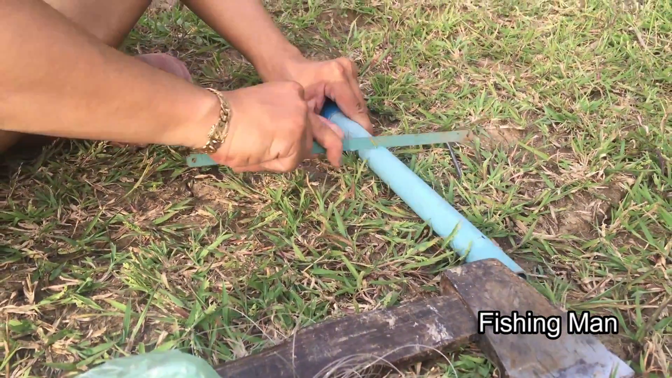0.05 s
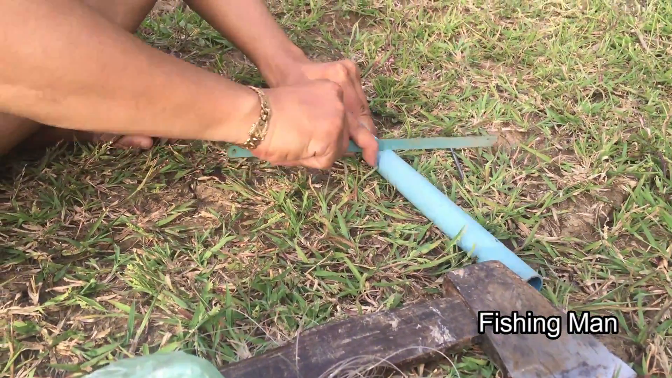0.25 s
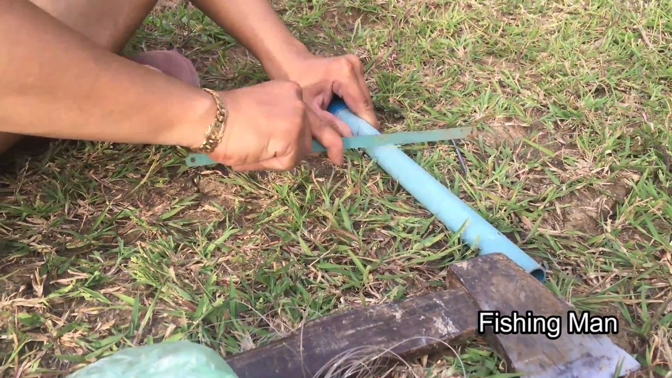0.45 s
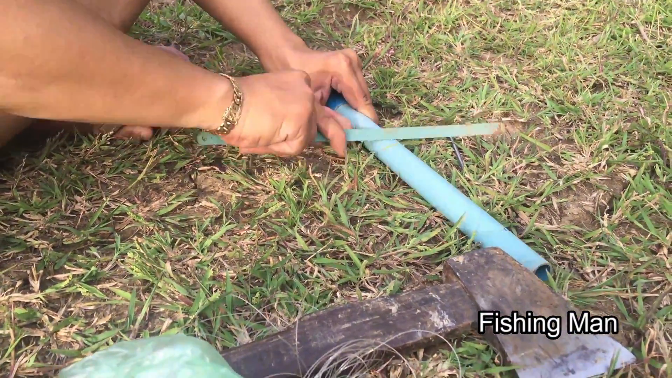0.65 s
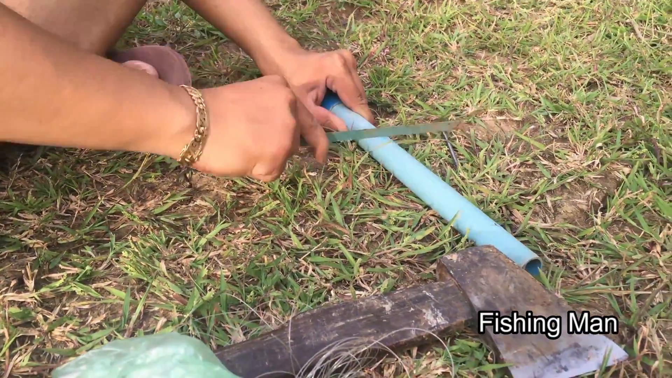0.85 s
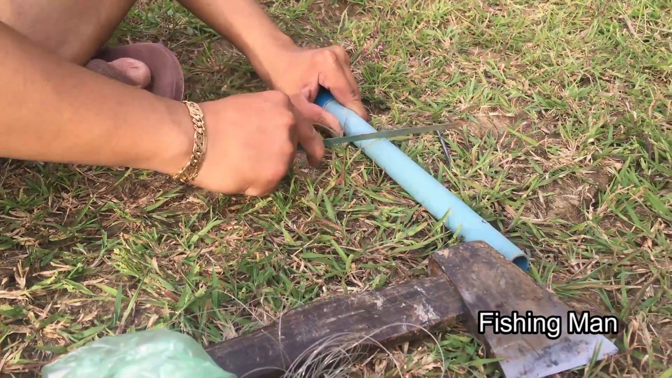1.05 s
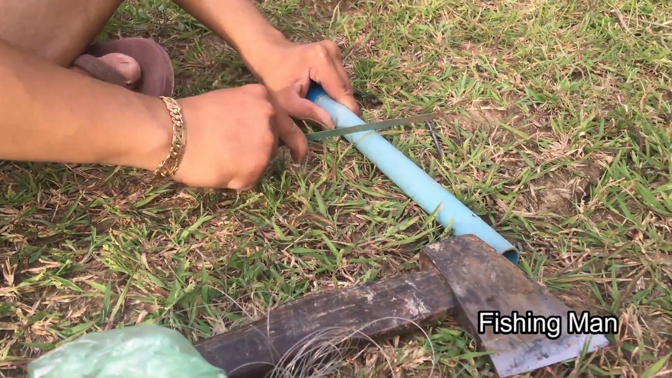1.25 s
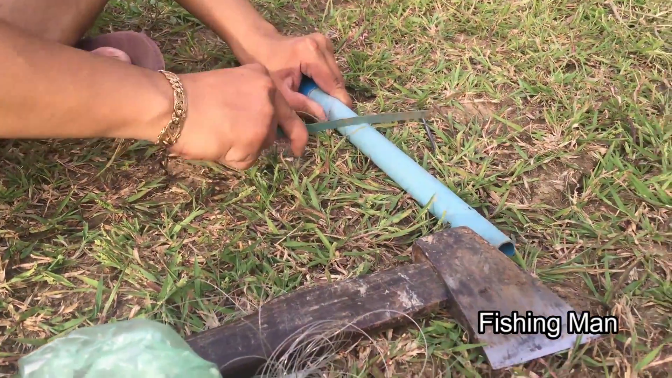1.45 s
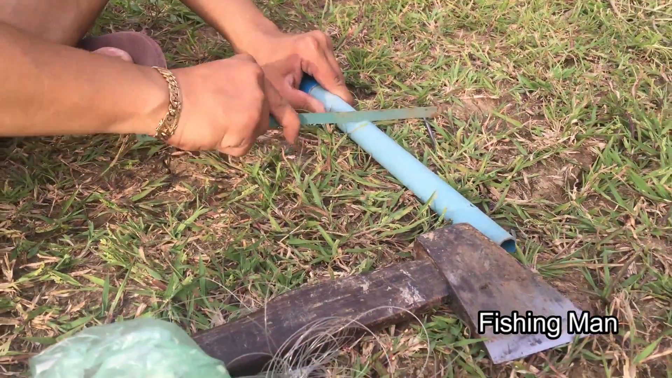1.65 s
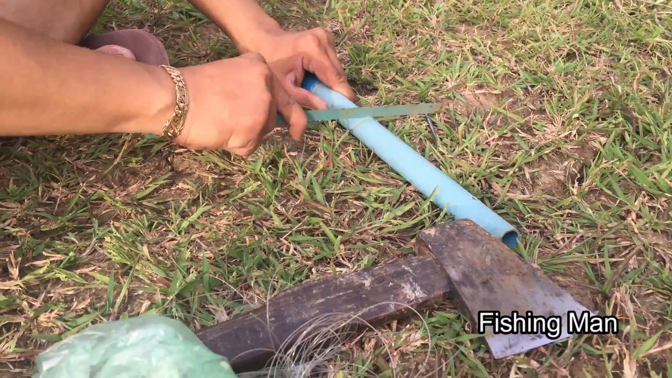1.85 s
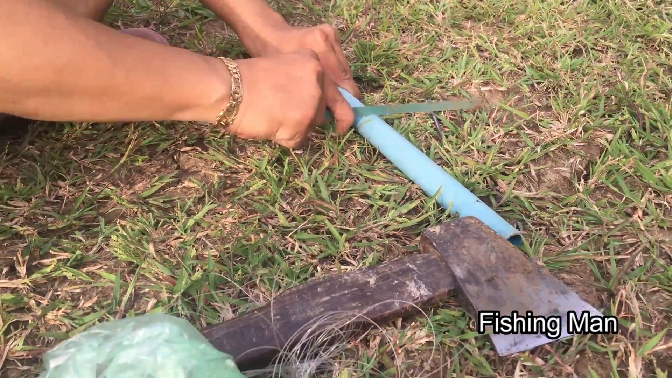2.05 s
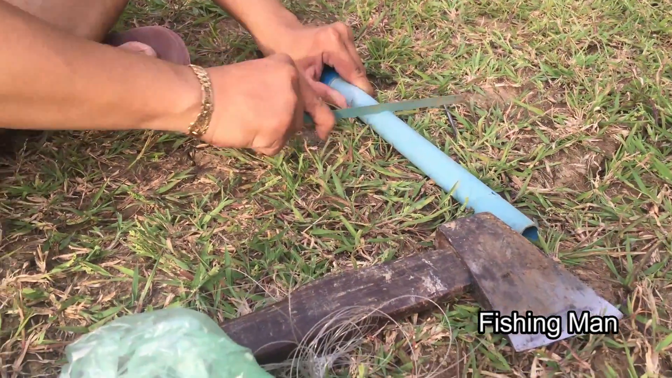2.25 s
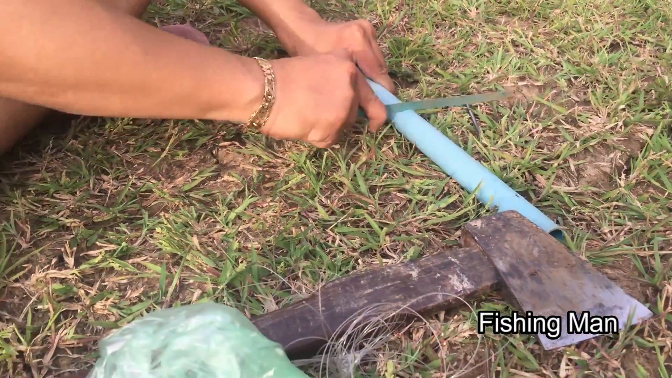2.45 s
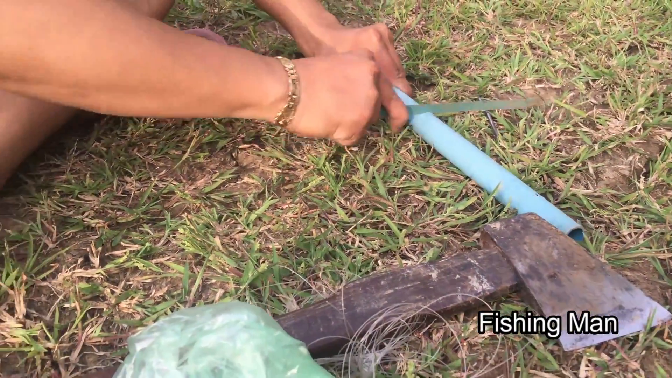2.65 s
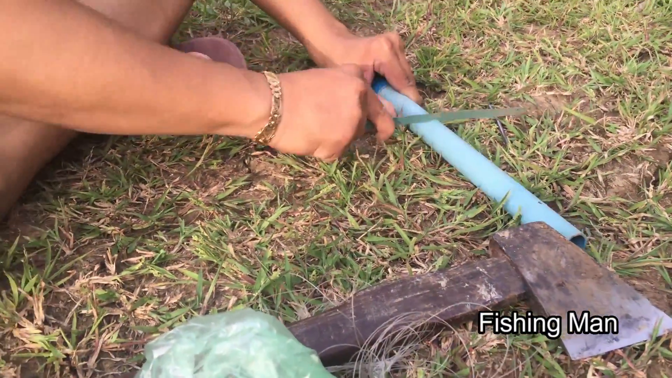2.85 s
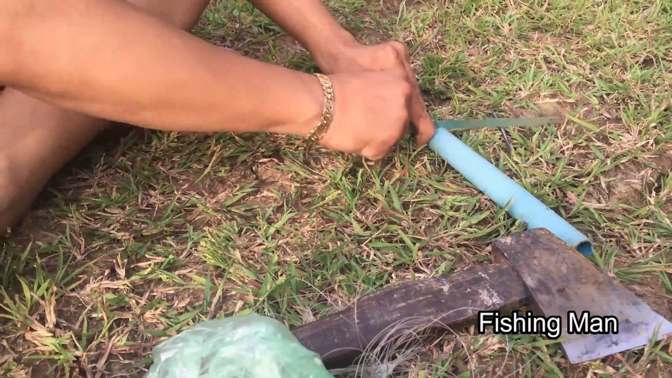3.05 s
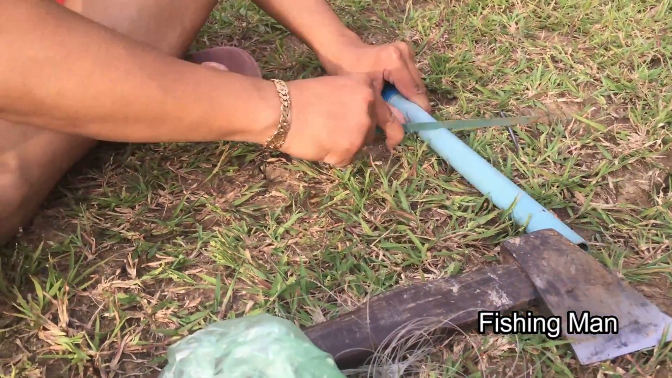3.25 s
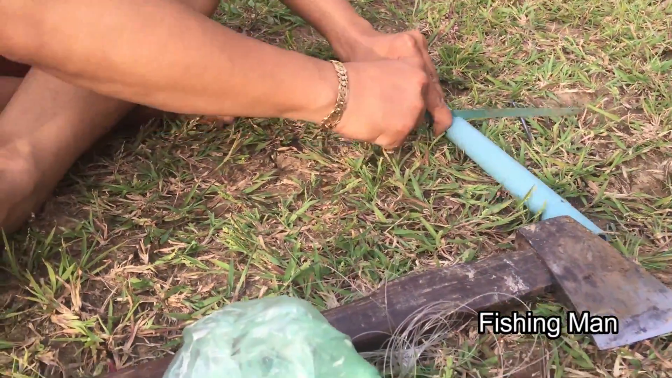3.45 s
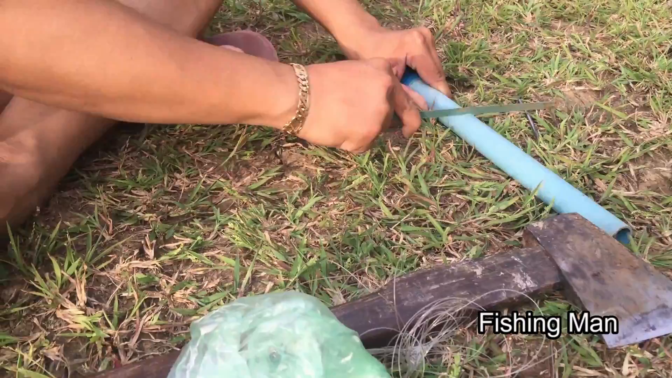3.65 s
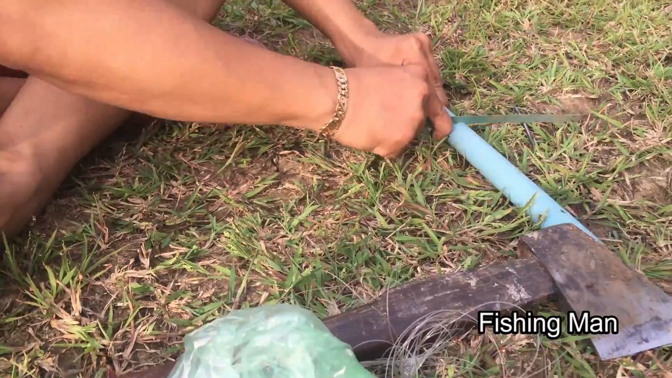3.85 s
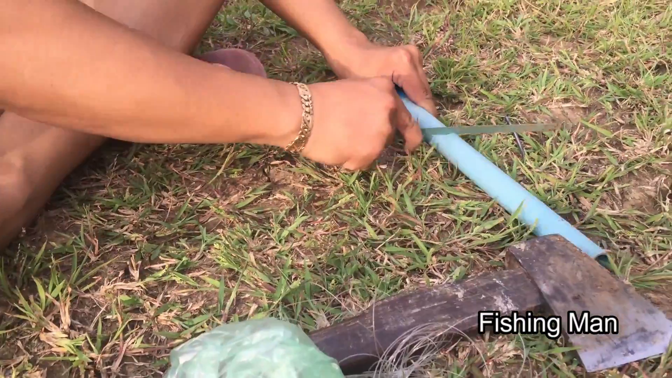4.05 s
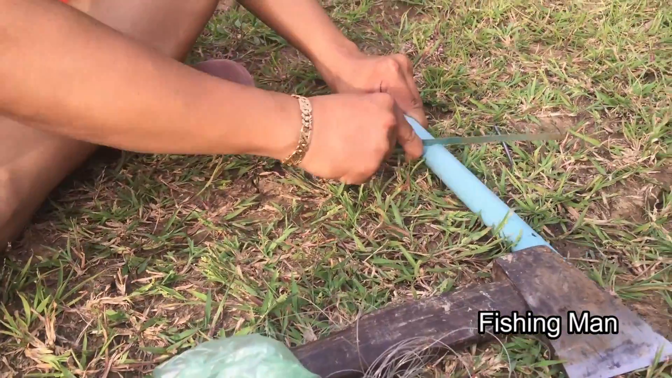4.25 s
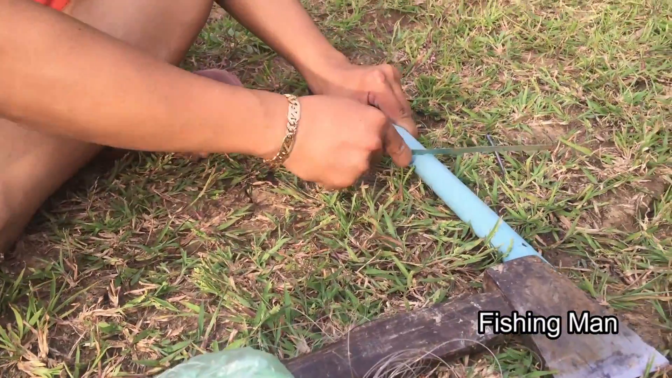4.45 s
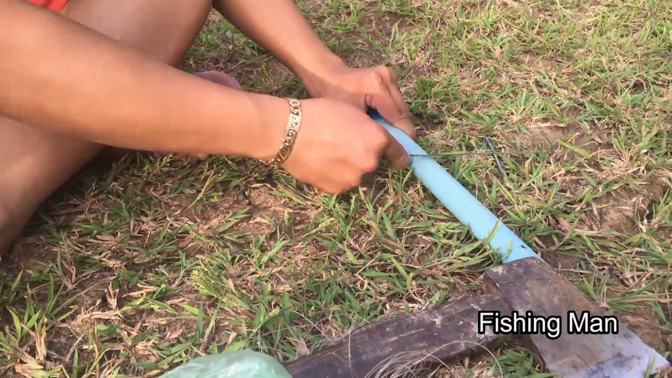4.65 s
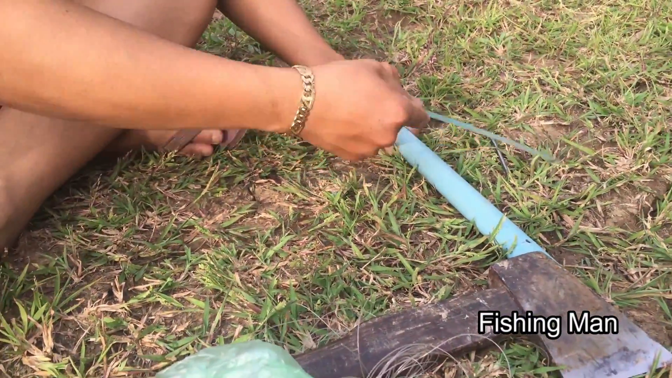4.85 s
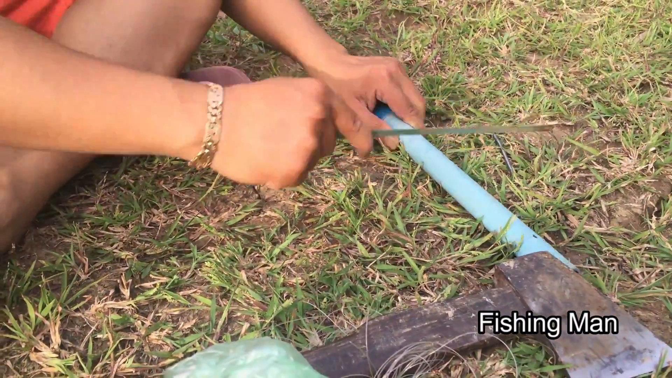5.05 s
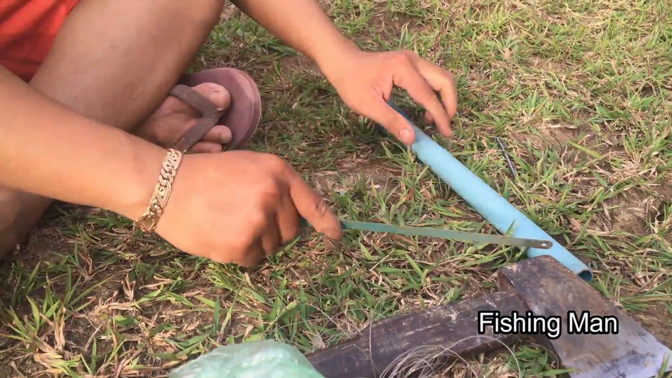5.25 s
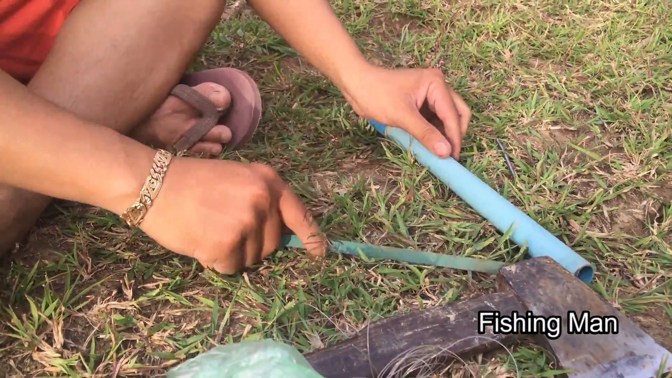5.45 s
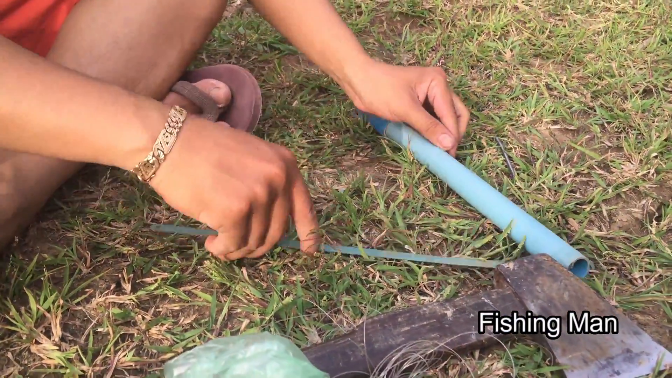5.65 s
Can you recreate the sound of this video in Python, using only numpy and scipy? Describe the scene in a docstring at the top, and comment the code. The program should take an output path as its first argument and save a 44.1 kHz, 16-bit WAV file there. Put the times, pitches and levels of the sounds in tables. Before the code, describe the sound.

Outdoors, dry and close: plastic pipe is sawn by hand with a fine-toothed blade. Two isolated strokes come first, then the blade sticks, nudging and ticking. A fast run of hissy, hollow rasping strokes follows with short squeaks and sharp tooth catches, ending in small clicks and near quiet. Wind rumbles and thumps, with soft rustles and one faint distant bird chirp.

```python
"""A bare hacksaw blade cuts a plastic pipe on grass, close up: a few strokes, a jam, then a quick run until it slips out.
Tooth bites drive the pipe's resonances for the rasp and the blade's treble for the hiss; the pulls stick and slip.
Snagged teeth ring wall, pipe, air and blade as short clicks; gliding tones make the squeaks of the pushes.
Wind buffets the microphone as shaped noise and sinking thumps, over rustles, a quiet murmur and one far bird."""
import sys
import numpy as np
from scipy import signal
from scipy.fft import rfft, irfft, next_fast_len
from scipy.io import wavfile
from scipy.ndimage import uniform_filter1d, map_coordinates

SR = 44100
rng = np.random.default_rng(int(sys.argv[2]) if len(sys.argv) > 2 else 0)


def bounce(signal):
    """Save signal as a 16-bit WAV file at the path given by the first command-line argument."""
    frames = np.transpose(np.atleast_2d(signal))
    limited = np.clip(frames, -1, 1)
    pcm = np.round(limited * 32767).astype(np.int16)
    wavfile.write(sys.argv[1], SR, pcm)


N = 251811  # length in samples


def amp(db):
    """Decibels to gain."""
    return 10 ** (np.asarray(db) / 20)


def unit(x):
    """Scale to rms 1."""
    return x / np.sqrt(np.mean(x ** 2) + 1e-20)


def curves(rows):
    """One value per sample for each column after the time."""
    times, *columns = np.transpose(rows)
    return [np.interp(np.arange(N) / SR, times, column) for column in columns]


def wobble(rate):
    """A smooth random curve, rate knots a second."""
    knots = rng.standard_normal(int(N * rate / SR) + 4)
    return map_coordinates(knots, [np.arange(N) * rate / SR])


def filtered(x, response):
    """x times a response over frequency, padded so that it can ring on."""
    size = next_fast_len(len(x) + 8192)
    return irfft(rfft(x, size) * response(np.fft.rfftfreq(size, 1 / SR)), size)[:len(x)]


def coloured(x, spectrum):
    """x shaped by (frequency [Hz], level [dB]) points, at rms 1."""
    hz, db = np.transpose(spectrum)
    return unit(filtered(x, lambda f: amp(np.interp(np.log(f + 1), np.log(hz), db))))


def ring(x, modes):
    """x through parallel damped resonances: (frequency [Hz], width [Hz], level [dB])."""
    def response(f):
        return sum(amp(db) * 1j * f * width / (centre * centre - f * f + 1j * f * width)
                   for centre, width, db in modes)
    return filtered(x, response)


def bandpass(x, low_hz, high_hz):
    """Keep the band between two frequencies."""
    return signal.sosfilt(signal.butter(3, [low_hz, high_hz], "band", fs=SR, output="sos"), x)


def add(track, start_s, sound):
    """Mix a sound into a track."""
    part = track[max(round(start_s * SR), 0):][:len(sound)]
    part += sound[:len(part)]


def patchy(x, depth_db, span_hz, span_s):
    """Let the colour drift: smooth random gains over frequency and time, at rms 1."""
    bins = signal.stft(x, nperseg=512)[2]
    field = rng.standard_normal(bins.shape)
    for _ in range(2):
        field = uniform_filter1d(field, max(round(span_hz * 512 / SR), 1), axis=0)
        field = uniform_filter1d(field, max(round(span_s * SR / 256), 1), axis=1)
    return unit(signal.istft(bins * amp(depth_db * unit(field)), nperseg=512)[1][:N])


# colour of the distant murmur: (frequency [Hz], relative level [dB])
MURMUR_SPECTRUM = [(210, -10.5), (350, -10.5), (415, -11), (820, -10), (1080, -11.5), (1170, -10.5),
                   (1950, -12.5), (4560, -18.5), (8000, -32.5), (10400, -52), (17600, -120)]
# colour of the faint high hiss: (frequency [Hz], relative level [dB])
AIR_SPECTRUM = [(3500, -40), (6000, 6.5), (9500, 3), (11000, 2.5), (15000, 3), (16000, 0.5)]


def background(murmur_db, air_db):
    """Distant murmur of the field, gently swaying noise, and a faint steady high hiss."""
    murmur = patchy(coloured(rng.standard_normal(N), MURMUR_SPECTRUM), depth_db=2.5, span_hz=200, span_s=0.041)
    air = coloured(rng.standard_normal(N), AIR_SPECTRUM)
    return amp(murmur_db + 1.8 * wobble(6.3)) * murmur + amp(air_db) * air


def bird(start_s, length_s, low_hz, high_hz, db):
    """One far, wavering chirp: a sine that rises, levels off and barely dips."""
    out = np.zeros(N)
    u = np.linspace(0, 1, int(length_s * SR))
    glide_hz = low_hz + (high_hz - low_hz) * np.sin(2 * u)
    hz = glide_hz * (1 + 0.011 * wobble(350)[:len(u)])
    swell = np.sin(np.pi * u) ** .5
    add(out, start_s, amp(db) * swell * np.sin(2 * np.pi * np.cumsum(hz) / SR))
    return out * amp(4.3 * wobble(90))


# grass, hands and the pipe shifting on the ground:
# (start [s], length [s], centre [Hz], level before the trim [dB])
RUSTLES = [(1.404, 0.053, 980, -62.5), (2.732, 0.04, 855, -45.5), (2.766, 0.074, 1217, -54),
           (3.282, 0.02, 1010, -53.5), (4.748, 0.64, 15000, -71.5), (5.426, 0.076, 9060, -68),
           (5.54, 0.25, 11920, -73)]


def rustles(trim_db, grain_db):
    """Soft swells of grainy noise, each through one broad resonance twice."""
    out = np.zeros(N)
    grains = unit(rng.standard_normal(N) * amp(grain_db * wobble(400)))
    for start, length, hz, db in RUSTLES:
        rub = grains[round(start * SR):][:round(length * SR)]
        resonance = [(hz, hz * .8, 0)]
        swell = np.sin(np.linspace(0, np.pi, len(rub)))
        add(out, start, amp(db + trim_db) * swell * unit(ring(ring(rub, resonance), resonance)))
    return out


EDDIES_PER_S, EDDY_DB, EDDY_SCATTER_DB = 13, 6, 2.5  # level re the wind pressure, and its largest scatter
EDDY_HZ, EDDY_SPREAD = 91.9, 0.32  # nominal pitch, and its largest scatter as a log ratio


def lesser_eddies(pressure_db):
    """One eddy somewhere in each short stretch of time, following the wind's strength there."""
    rows = []
    for k, (place, size, pitch) in enumerate(rng.uniform(-1, 1, (int(EDDIES_PER_S * N / SR), 3))):
        start = (k + .5 + place / 2) / EDDIES_PER_S
        db = pressure_db[min(int(start * SR), N - 1)] + EDDY_DB + EDDY_SCATTER_DB * size
        rows.append((start, db, EDDY_HZ * np.exp(EDDY_SPREAD * pitch)))
    return rows


# wind pressure on the microphone, before ceiling, lumps and trim: (time [s], level [dB])
WIND_PRESSURE = [(0, -55), (.07, -23), (.21, -46), (.31, -31), (.48, -45), (.57, -31.5), (.95, -38),
                 (1.06, -42), (1.5, -46), (1.62, -53.5), (1.8, -42), (1.93, -51.5), (2.01, -36.5),
                 (2.22, -58), (2.37, -36), (3.08, -31.5), (3.3, -45), (3.58, -38.5), (3.72, -49.5),
                 (3.87, -35), (4.17, -39.5), (4.36, -32), (4.6, -46), (5.2, -48.5), (5.5, -44.5),
                 (5.71, -45)]
# the hardest eddies thump the microphone: (time [s], level before the trim [dB], nominal pitch [Hz])
EDDIES = [(0.044, -20.5, 117), (0.296, -22, 79), (0.423, -28, 100), (0.555, -17.5, 87.5),
          (0.741, -25.5, 102), (0.875, -21, 73.5), (0.966, -27.5, 124), (1.472, -31, 103),
          (1.783, -33, 100.9), (1.988, -28, 68), (2.4, -16, 112), (2.483, -20.5, 80), (2.638, -24, 109.1),
          (2.678, -17, 166.4), (2.966, -23, 82), (3.17, -17, 63.3), (3.528, -24.5, 91), (3.579, -23, 75.55),
          (3.945, -25, 129.9), (4.302, -22.5, 70), (4.383, -23, 98.7), (4.44, -25.5, 82),
          (4.987, -28.5, 100.6)]
# colour of the buffeting: (frequency [Hz], relative level [dB])
RUMBLE_SPECTRUM = [(15, -48), (30, -18), (50, -1.5), (70, 1.5), (120, -6), (200, -20), (300, -36.5),
                   (420, -58), (650, -77), (1200, -99)]
# colour of the gusts' flutter: (frequency [Hz], relative level [dB])
FLUTTER_SPECTRUM = [(40, -12), (110, -1), (170, -3), (280, -5), (400, -16.5), (600, -37), (1200, -94)]


def wind(trim_db, ceiling_db, flutter_db, lumps_db, eddy_trim_db, cycles, low_cut_hz):
    """Low buffeting in lumps; the hardest blows arrive as single eddies that thump and sink in pitch."""
    pressure_db, = curves(WIND_PRESSURE)
    pressure_db = np.minimum(pressure_db, ceiling_db) + lumps_db * np.clip(wobble(38), -1.5, 1)
    flow = coloured(rng.standard_normal(N), RUMBLE_SPECTRUM)
    flow = flow / np.sqrt(uniform_filter1d(flow ** 2, SR // 25) + 0.045)  # even out its own swells
    out = amp(pressure_db + trim_db) * flow
    # flutter grows faster than the pressure, in brief spurts
    spurts_db = 5.16 * np.clip(wobble(70), -2, 1.5)
    flutter = coloured(rng.standard_normal(N), FLUTTER_SPECTRUM)
    out += amp(1.249 * pressure_db + flutter_db + spurts_db) * flutter
    t = np.arange(SR // 10) / SR
    for start, db, hz in EDDIES + lesser_eddies(pressure_db):
        age = t * hz / cycles
        turns = hz * t * 0.64 + 0.87 * (1 - np.exp(-age))  # the pitch sinks as the eddy ages
        thump = (age * np.exp(1 - age)) ** 2 * np.sin(2 * np.pi * turns)
        add(out, start, amp(db + eddy_trim_db) * thump)
    return filtered(out, lambda hz: 1 / np.sqrt(1 + (low_cut_hz / (hz + 1)) ** 6))


def surroundings(x, t60):
    """Scatter from the ground and nearby things: x through a short decaying noise tail."""
    t = np.arange(SR // 3) / SR
    tail = rng.standard_normal(len(t)) * amp(-60 * t / t60) * (t > .003)
    return signal.fftconvolve(x, tail / np.linalg.norm(tail))[:N]


# steel squeaks in the slot: (start [s], length [s], start pitch [Hz], end pitch [Hz], level before the trim [dB])
SQUEAKS = [(0.068, 0.018, 5100, 3560, -40.5), (0.41, 0.0098, 2940, 4950, -36.5),
           (0.488, 0.013, 2890, 4080, -41), (2.2, 0.0089, 3220, 6000, -38.5),
           (2.591, 0.01, 4302, 4600, -38), (3.247, 0.0048, 4750, 5350, -36),
           (3.27, 0.0085, 2520, 4550, -38)]


def squeaks(trim_db, waver):
    """Short, hoarse gliding whistles where the blade's flank rubs the slot."""
    out = np.zeros(N)
    unsteady = 1 + waver * wobble(2500)
    for start, length, start_hz, end_hz, db in SQUEAKS:
        u = np.linspace(0, 1, int(length * SR))
        hz = (start_hz + (end_hz - start_hz) * u) * unsteady[round(start * SR):][:len(u)]
        phase = 2 * np.pi * np.cumsum(hz) / SR
        tone = np.sin(phase) + 0.22 * np.sin(2 * phase)
        add(out, start, amp(db + trim_db) * np.sin(np.pi * u) * tone)
    return out


# return strokes, in which the blade sticks and slips; arm() plays them too:
# (start [s], end [s], rasp [dB], hiss [dB], growth of the hiss [dB], attack [s],
#  first snag re rasp [dB], chatter depth [dB]), rasp and hiss before their trims
PULLS = [(0.227, .326, -48, -60, -3, .028, -6, 0), (1.952, 2.084, -46, -55, 11, .003, 16.5, 2.5),
         (2.323, 2.447, -45.5, -54.5, -5, 0.023, 5, -0.5), (2.664, 2.765, -43, -52, -1, 0.0042, 21.5, 1),
         (3.013, 3.1, -42.5, -54, 1, 0.0032, 14, 4), (3.382, 3.449, -41, -55, -6, .004, 11, 2),
         (3.744, 3.835, -42, -53, -5, 0.0051, 17, 3.5), (4.158, 4.19, -40, -60.5, -3, .028, -2, 1.5)]
SNAGS_PER_S, SNAG_DB, SNAG_SCATTER_DB = 22, 7.5, 1  # nominal rate of chance snags; levels re the pull's rasp
SNAG_HZ, SNAG_KNOCK_DB, SNAG_TICK_DB = 2160, -12.5, -18  # their colour, as in the catches


def snags():
    """Further catches: one as each pull starts, soft or hard, then others by chance along it."""
    rows = []
    for start, end, rasp_db, *_, first_db, _ in PULLS:
        chance, scatter = rng.random((8, 2)), rng.standard_normal((8, 2))
        rows.append((start + 0.0022, rasp_db + first_db, SNAG_HZ, SNAG_KNOCK_DB, SNAG_TICK_DB))
        for (place, luck), (size, pitch) in zip(chance, scatter):
            if luck < SNAGS_PER_S * (end - start) / len(chance):
                time = start + place * (end - start)
                db = rasp_db + SNAG_DB + SNAG_SCATTER_DB * size
                rows.append((time, db, SNAG_HZ * np.exp(.1 * pitch), SNAG_KNOCK_DB, SNAG_TICK_DB))
    return rows


# teeth catch hard and snap free, levels before the trims:
# (time [s], snap level [dB], snap pitch [Hz], knock of the pipe re snap [dB], tick of the blade re snap [dB])
CATCHES = [(0.0541, -29.5, 2730, 8, -10), (0.0576, -25.5, 2030, -1.5, 0), (0.3222, -37, 1840, -13, 1),
           (0.405, -23.5, 2200, -30, -12), (0.609, -27.5, 1900, -17, -19),
           (0.6142, -26.5, 2920, -14, -15.5), (0.627, -24, 2130, -12.5, -27),
           (1.0785, -25.5, 2390, -29, -21), (1.4279, -19, 2780, -52, -12.5), (2.3326, -28, 2000, -31, -12),
           (2.74, -38.5, 1750, 10.5, -17), (2.7504, -31.5, 2090, 3, -11), (2.8506, -26, 2163, -8, -18),
           (2.8583, -30, 2245, -4, -15), (3.2007, -24, 1771, 2.5, -14), (3.2058, -21, 2202, -5, -3.5),
           (3.3943, -33, 2270, -3, -24), (3.782, -24.5, 2200, -16, -30), (3.7954, -29, 2260, -21, -25),
           (3.9598, -21.5, 1786, 0.5, -11), (3.965, -22, 2058, -10, -2.5), (4.1693, -31.5, 1805, -6, -19),
           (4.3341, -26.5, 1827, 1, -10.5), (4.7758, -33.5, 3120, -10.5, -5),
           (4.7851, -28, 2800, -20, -7.5)]
# resonances of the wall's snap, added to each catch's own: (frequency [Hz], width [Hz], level [dB])
SNAP_MODES = [(2140, 100, -36.5), (3140, 790, -7.5), (4050, 150, -7.5)]
# resonances of the whole pipe's knock: (frequency [Hz], width [Hz], level [dB])
KNOCK_MODES = [(484, 230, -4), (814, 640, -1.5), (1110, 190, 3.5), (1297, 100, 7), (1770, 200, -9)]
# resonances of the blade's tick: (frequency [Hz], width [Hz], level [dB])
BLADE_MODES = [(5800, 1500, -14), (6300, 2900, 2), (8960, 660, 4), (11630, 570, -7), (15400, 4500, -3.5)]
# the air column inside the pipe, also rung by sawing(): (frequency [Hz], width [Hz], level [dB])
BORE_MODES = [(485, 34, 5), (998, 13, 0.5)]


def catches(crunch_s, grit, snap_width_hz, snap_trim_db, knock_trim_db, tick_trim_db, bore_db):
    """A snagged tooth lets go: a jolt and a brief crunch ring the wall, the whole pipe, its air and the blade."""
    out = np.zeros(N)
    t = np.arange(SR // 8) / SR
    jolt = signal.unit_impulse(len(t), round(crunch_s * SR))
    for start, db, snap_hz, knock_db, tick_db in CATCHES + snags():
        crunch = rng.standard_normal(len(t)) * t / crunch_s * np.exp(-t / crunch_s)
        crack = grit * crunch + jolt
        snap = bandpass(ring(crack, SNAP_MODES + [(snap_hz, snap_width_hz, 0)]), 1730, 4280)
        body = bandpass(ring(crack, KNOCK_MODES) + amp(bore_db) * ring(crack, BORE_MODES), 290, 2180)
        steel = bandpass(ring(crunch, BLADE_MODES), 2400, SR * .45)
        parts = ((snap, snap_trim_db), (body, knock_db + knock_trim_db), (steel, tick_db + tick_trim_db))
        for part, level_db in parts:
            add(out, start, amp(db + level_db) * part / np.abs(part).max())
    return out


BRUSH_DB = -15  # the teeth bite after a light brush of the slot
BRUSH_DB_PER_S, RELEASE_DB_PER_S = 270, 750  # the brush grows; the stroke dies as the arm stops
SLIDE_DB, SLIDE_DB_PER_S = -21, 70  # the flank still slides in the slot while the arm turns round
EASE_DB, ARCH_DB = 4.5, 4  # the rasp sags as the hand eases off; the hiss is weaker at the slow ends


def stroke(start, end, rasp_db, hiss_db, growth_db=0, attack_s=.025):
    """Rasp and hiss of one stroke in dB: a brush, the bite, an arch of speed under easing pressure, the stop."""
    t = np.arange(N) / SR
    before, after = np.maximum(start - t, 0), np.maximum(t - end, 0)
    travel = np.clip((t - start) / (end - start), 0, 1) - .5
    brush_db = BRUSH_DB * np.clip(.5 - (t - start) / attack_s, 0, 1)
    bite_db = brush_db - BRUSH_DB_PER_S * before - RELEASE_DB_PER_S * after
    contact_db = np.maximum(bite_db, SLIDE_DB - SLIDE_DB_PER_S * (before + after))
    rasp = bite_db + rasp_db - EASE_DB * travel
    hiss = contact_db + hiss_db + growth_db * travel - ARCH_DB * (2 * travel) ** 2
    return np.array([rasp, hiss])


# forward strokes, smooth and hissing, levels before the trims:
# (start [s], end [s], rasp of the pipe [dB], hiss of the blade [dB], growth of the hiss [dB],
#  attack [s], blade's own note re hiss [dB])
PUSHES = [(0.051, 0.137, -46.5, -49, -3, 0.011, -3), (.395, 0.508, -48, -47, -4, .016, -9.5),
          (2.159, 2.275, -46, -48, 4, .014, -9), (2.504, 2.605, -47, -50.5, 11, .012, 1),
          (2.848, 2.953, -47, -48, -3, .004, -2), (3.199, 3.287, -44.5, -47.5, -5, .004, -1),
          (3.559, 3.668, -47, -48.5, -3, .005, -3), (3.959, 4.034, -44.5, -48, -4, .005, -1)]
# the blade only nudges in the slot, wedged or turning round:
# (start [s], end [s], rasp [dB], hiss [dB]), before the trims
NUDGES = [(0.567, .642, -56, -68), (.783, .797, -53.5, -69), (1.05, 1.097, -60, -77),
          (1.412, 1.472, -61, -70), (2.78, 2.835, -55, -63), (4.315, 4.347, -52.5, -70)]
REST_RASP_DB, REST_HISS_DB = -71.5, -84  # the blade lying in the slot, before the trims
HAND_DB, HAND_PER_S = 1.15, 55  # the hand's pressure wavers: depth, knots a second


def arm(push_chatter_db):
    """The stroke with the strongest rasp sets note, direction and chatter; the loudest set rasp and hiss."""
    moves = [(stroke(*shape), note_db, 0, push_chatter_db) for *shape, note_db in PUSHES]
    moves += [(stroke(*shape), 0, 1, depth_db) for *shape, _, depth_db in PULLS]
    moves += [(stroke(*shape), 0, 1, 0) for shape in NUDGES]
    levels, *settings = map(np.array, zip(*moves))
    rasp_db, hiss_db = levels.max(axis=0) + HAND_DB * wobble(HAND_PER_S)
    current = levels[:, 0].argmax(axis=0)
    held = [uniform_filter1d(1. * setting[current], SR // 100) for setting in settings]  # 10 ms crossings
    return np.maximum(rasp_db, REST_RASP_DB), np.maximum(hiss_db, REST_HISS_DB), *held


def teeth(speed, tooth_hz, scatter_db, bite_s, scrape):
    """Each passing tooth tears off a chip: a tiny burst of uneven size, over steady scraping."""
    passed = np.cumsum(tooth_hz * speed * np.exp(.2 * wobble(300))) / SR
    sizes = amp(scatter_db * np.clip(rng.standard_normal(N), -2, 2))
    bites = np.diff(np.floor(passed), prepend=0) * sizes
    tearing = signal.lfilter([1], [1, -np.exp(-1 / (bite_s * SR))], bites)
    return unit((unit(tearing) + scrape) * rng.standard_normal(N))


def chatter(depth_db, slip_hz, unevenness):
    """The blade sticks and slips at an uneven rate; each slip starts sharply and fades."""
    cycle = np.cumsum(slip_hz * np.exp(unevenness * wobble(90))) / SR % 1
    gain = amp(depth_db * (unit(.5 - cycle) + .55 * wobble(130)))
    return gain / np.sqrt(uniform_filter1d(gain ** 2, SR // 40))  # keep the average level


# resonances of the pipe wall and blade: (frequency [Hz], width [Hz], level [dB])
PIPE_MODES = [(948, 206, -3.5), (1445, 87, 1), (1945, 290, 2), (2146, 107, 0), (2780, 280, -9.5),
              (3000, 450, -5.5), (4140, 160, -10), (5440, 1110, -5)]
# the blade's own note: (frequency [Hz], width [Hz], level [dB])
BLADE_NOTE = [(9400, 400, 0)]
# colour of the hiss on pushes: (frequency [Hz], relative level [dB])
PUSH_HISS = [(2650, -26), (4500, -5), (5680, -1), (6250, -5), (6880, -2), (9260, -1.5), (10400, -5),
             (11800, -6.5), (12900, -10), (15000, -2.5), (16000, -11.5)]
# colour of the hiss on pulls and nudges: (frequency [Hz], relative level [dB])
PULL_HISS = [(2650, -31), (4500, -1.5), (4600, -28), (5560, -4.5), (6220, -6), (7030, 1.5), (7690, -9),
             (9070, -1), (10500, -11.5), (11800, -8), (12900, -16), (15100, -9), (16000, -21)]


def sawing():
    """Teeth drive the pipe wall and the thin blade; a faster blade is louder and passes more teeth."""
    rasp_db, hiss_db, note_db, pulling, depth_db = arm(push_chatter_db=1.16)
    speed = np.clip(amp(.3 * (hiss_db - hiss_db.max())), .2, 1)  # share of full speed, from the hiss
    bites = teeth(speed, tooth_hz=1000, scatter_db=3.5, bite_s=.0004, scrape=.5)
    force = bites * chatter(depth_db, slip_hz=132.3, unevenness=0.19)
    drive = coloured(force, [(200, 8.5), (600, -2.5), (4000, 4.0), (6500, -14.0), (12000, -26)])
    # the colours of rasp and hiss drift at random, smoothly over frequency and time
    rasp = ring(drive, PIPE_MODES) + amp(-15.5) * ring(drive, BORE_MODES)
    rasp = patchy(rasp, depth_db=2.5, span_hz=200, span_s=0.068)
    # the blade's flanks add a smoother rub to the bites
    rub = force + 0.58 * rng.standard_normal(N)
    note = unit(ring(rub, BLADE_NOTE))
    push = unit(coloured(rub, PUSH_HISS) + amp(note_db - 3.0) * note)
    hiss = (1 - pulling) * push + pulling * coloured(rub, PULL_HISS)
    hiss = patchy(hiss, depth_db=3.0, span_hz=400, span_s=.05)
    return amp(rasp_db - 2.5) * rasp + amp(hiss_db - 1) * hiss


def scene():
    """Field, wind and saw at one microphone."""
    outdoors = background(murmur_db=-65.5, air_db=-74.5)
    outdoors += bird(start_s=4.605, length_s=0.06, low_hz=4150, high_hz=4680, db=-66)
    outdoors += rustles(trim_db=2, grain_db=3.5)
    gusts = wind(trim_db=-3.0, ceiling_db=-34, flutter_db=-5, lumps_db=4.5,
                 eddy_trim_db=0.0, cycles=0.57, low_cut_hz=31)
    saw = squeaks(trim_db=1, waver=0.1)
    saw += catches(crunch_s=0.000985, grit=0.43, snap_width_hz=330,
                   snap_trim_db=-4.0, knock_trim_db=2, tick_trim_db=-0.5, bore_db=0.5)
    saw += sawing()
    return (saw + amp(-17.0) * surroundings(saw, t60=0.21) + outdoors + gusts)[None]


TOP_HZ = 16100


def record(dry):
    """Cut everything from the band limit upwards."""
    return np.array([filtered(x, lambda hz: hz < TOP_HZ) for x in dry])


dry = scene()
out = record(dry)
bounce(out)
```